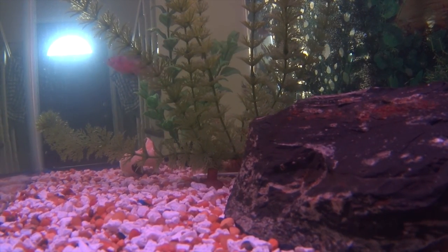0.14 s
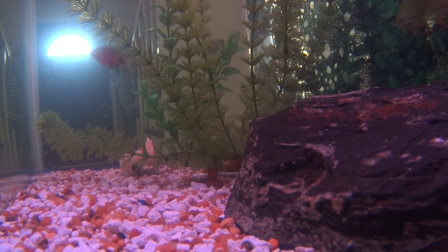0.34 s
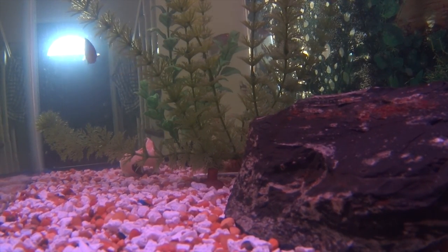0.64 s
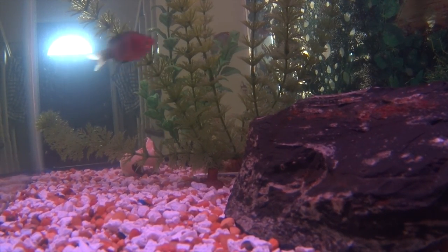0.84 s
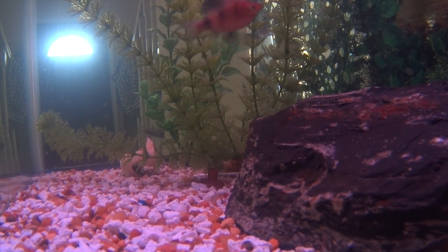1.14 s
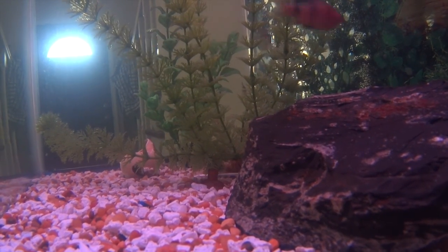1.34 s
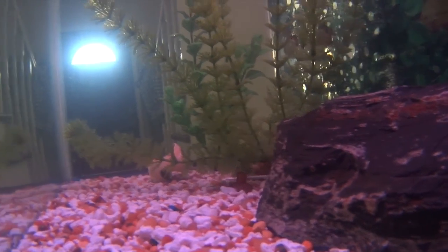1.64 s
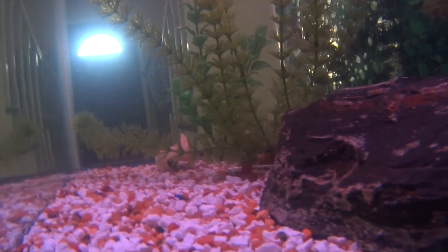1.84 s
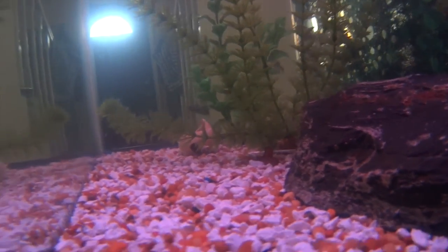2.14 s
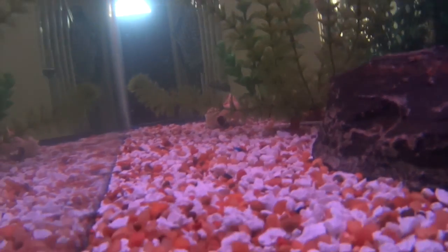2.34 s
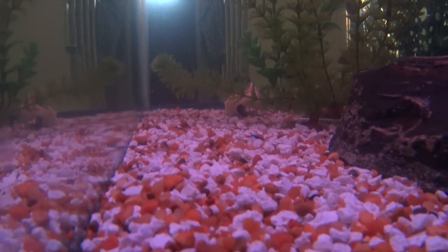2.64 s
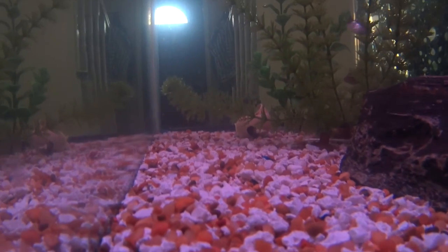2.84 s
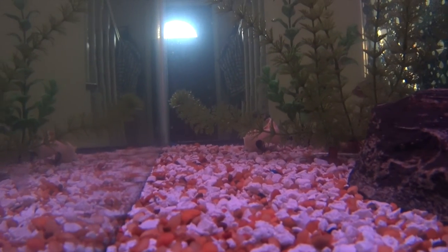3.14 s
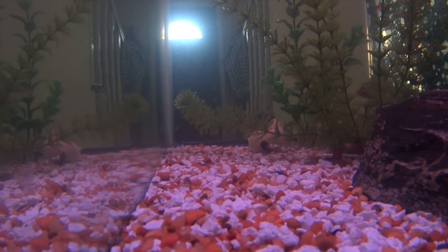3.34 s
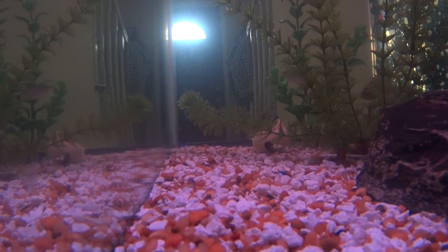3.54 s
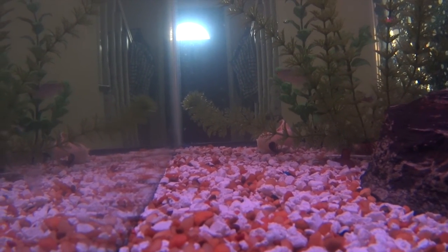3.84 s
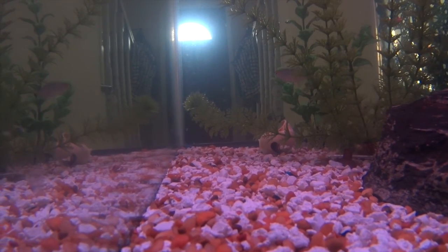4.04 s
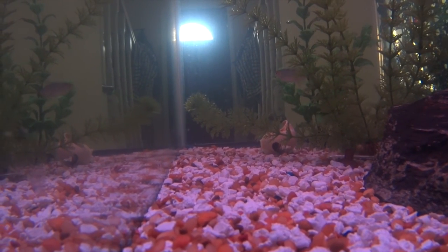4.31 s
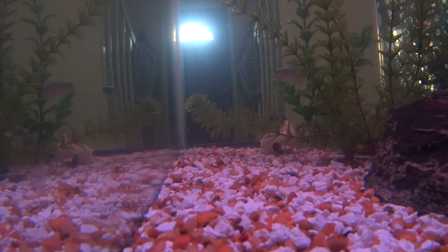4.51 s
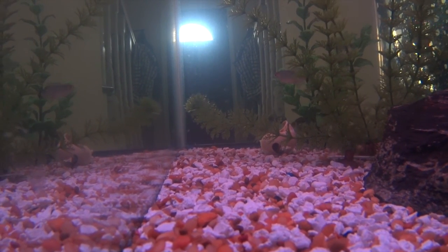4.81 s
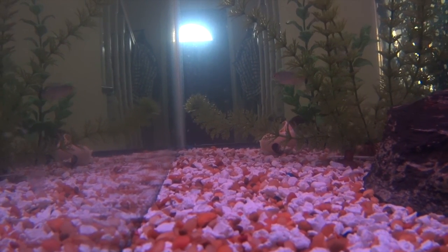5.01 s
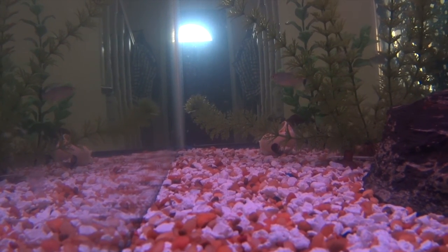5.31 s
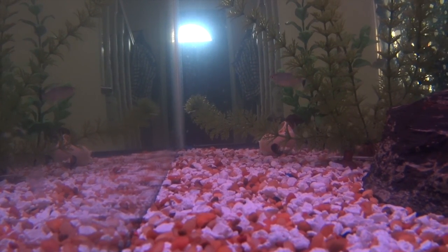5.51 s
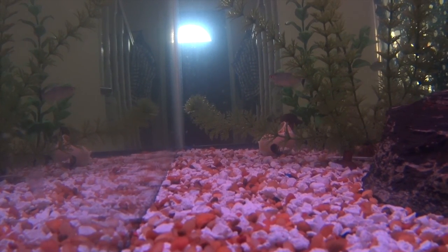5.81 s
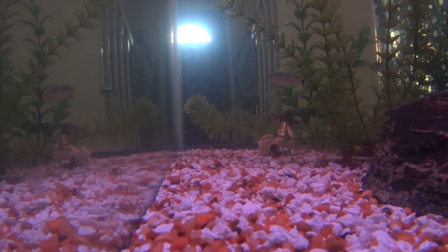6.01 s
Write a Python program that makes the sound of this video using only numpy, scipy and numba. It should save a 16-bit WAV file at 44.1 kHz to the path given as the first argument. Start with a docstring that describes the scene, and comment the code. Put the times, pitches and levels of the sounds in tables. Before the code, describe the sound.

Deep aquarium pump hum with faint gurgles; a camera case bangs and scrapes over gravel, then bubbles pop over a softened hum.

```python
"""Camera moved in a fish tank

A camera in a waterproof case sits in a fish tank: mains harmonics make the pump hum, coloured random
clicks and noise the churning filter outflow, decaying tones and splashes the gurgling bubbles.
The case is slid to a new spot: struck modes make its knocks, shaped grains its scrape over gravel,
stick-slip tones its groans, and decaying pulses the dry clicks of overload among the loud knocks.
Loud knocks push the gain control down; the hum creeps back over seconds.
"""
import sys
import numpy as np
from scipy import signal
from scipy.fft import rfft, irfft
from scipy.io import wavfile
from numba import njit

SR = 44100
rng = np.random.default_rng(int(sys.argv[2]) if len(sys.argv) > 2 else 0)


def to_wav(s):
    """Save 16-bit WAV."""
    ch = np.atleast_2d(s).T  # columns
    pcm = np.round(np.clip(ch, -1, 1) * 32767)  # PCM
    wavfile.write(sys.argv[1], SR, pcm.astype(np.int16))


N = 271828
TIME = np.arange(N) / SR
FREQ = np.maximum(np.arange(N + 1) * SR / (2 * N), 1)  # bins of a transform of length 2 N [Hz]
MAINS_HZ = 60.0

# travel of the camera: (time [s], position [0 first spot to 1 second spot])
CAMERA_TRAVEL = [(0, 0.023), (1.6, 0), (2.1, 0.31), (2.4, 0.74), (2.7, 0.98), (6.16, 0.9)]
# gravel grit heard through the case: (frequency [Hz], relative level [dB])
GRAVEL_SPECTRUM = [(500, -25), (1400, -1.5), (2200, -9.5), (2600, -7.5), (2900, -0.5), (3300, -9.5),
                   (4000, -16), (4620, -3.5), (5100, -20), (5600, -14), (6300, -26.5), (7500, -27.5),
                   (9000, -47.5), (11000, -52)]


def knocks(crack_s=0.0039, low_hz=52):
    """Modal impact: blows ring the case and crack on gravel; a longer contact excites only low modes."""
    # blows on the case: (time [s], relative level [dB], contact time [s])
    blows = [(1.517, -23.5, 0.00058), (1.595, -24, 0.00044), (1.615, -13, 0.00074), (1.667, -19, 0.00043),
             (1.734, -20.5, 0.00062), (2.407, -2, 0.0013), (2.458, -3, 0.00094), (2.462, 11.5, 0.0066),
             (2.493, 0, 0.0012), (2.522, 2.5, 0.0016), (2.529, 13, 0.012), (2.553, 3, 0.0021),
             (2.579, 7, .004), (2.601, 4, 0.0048), (2.626, -9.5, 0.0008), (2.670, -4, 0.0012),
             (2.700, 4, 0.0086), (2.711, -6.5, 0.00067), (2.745, -6.5, 0.00099), (2.782, -2.5, 0.0014),
             (2.789, 7.5, 0.011), (2.815, -8.5, .0007), (2.934, -12.5, 0.00076), (2.979, 9, 0.008),
             (2.993, -17.5, 0.00045)]
    # modes of the struck case: (frequency [Hz], relative level [dB], t60 [s])
    case_modes = [(60, -11.5, .05), (93, -4.5, 0.11), (212, -9.5, 0.062), (285.3, 1, 0.07),
                  (402.6, 0.5, 0.082), (500, 1, 0.12), (617, -4.5, 0.034), (1300, 1.5, 0.043),
                  (2840, -14.5, 0.037), (4700, -20.5, 0.029), (7300, -28.5, .012)]
    # past the hard contact time the crack loses level with each doubling
    hard_contact_s, crack_db, loss_db_per_doubling = 0.00074, -9.5, 22.5

    force, cracks, t = np.zeros(N), np.zeros(N), TIME[:SR // 4]
    for s, db, contact in blows:
        push = t * np.exp(-2 * np.pi * t / contact)
        add(force, s, undb(db) * push / push.sum())
        doublings = max(np.log2(contact / hard_contact_s), 0)
        crack_level = undb(db + crack_db - loss_db_per_doubling * doublings)
        add(cracks, s, crack_level * np.exp(-t / crack_s))

    ring = sum(undb(db - 60 * t / t60) * np.sin(2 * np.pi * hz * t) for hz, db, t60 in case_modes)
    high_pass = signal.butter(2, low_hz, "high", fs=SR, output="sos")
    body = signal.sosfilt(high_pass, signal.fftconvolve(force, ring)[:N])
    crack_noise = cracks * spread(*rng.standard_normal((2, N)), width=.35)
    return undb(-6.0) * body + tint(crack_noise, spectrum(GRAVEL_SPECTRUM))


def slide(release_s=0.012, ring_q=15):
    """Stick-slip friction shakes the case; gravel grit rings a resonance that shifts with the grip."""
    # pushes along the gravel: (start [s], length [s], build-up [s], level [dB], relative grit level [dB],
    # case resonance [Hz], ring level relative to the grit [dB])
    pushes = [(1.361, .022, 0.017, -19.5, -13.5, 2850, -3), (1.517, 0.024, .022, -15, -19, 2850, -4),
              (1.549, 0.076, 0.075, -10.5, -17, 2720, 12), (1.628, 0.048, 0.023, -13.5, -11.5, 2840, -5),
              (1.686, 0.012, .01, -17, -22.5, 2800, -2), (2.405, 0.18, 0.017, -14, -43, 2900, -14),
              (2.635, 0.062, 0.028, -6.5, -18, 2900, -10), (2.708, 0.043, 0.017, -7, -11, 3030, -14),
              (2.758, 0.074, .012, -7, -15.5, 2910, -6), (2.838, 0.06, 0.016, -6.5, -19, 2950, -12),
              (2.913, 0.074, 0.023, -7.5, -17, 2900, -7)]
    # body of the rubbing: (frequency [Hz], relative level [dB])
    rub_spectrum = [(25, -42), (60, 1), (105, 4.5), (230, -2.5), (400, -6), (610, -6), (780, -15.5),
                    (1300, -17), (1700, -34), (3000, -75)]

    body = tint(grains(2500, 0.54), spectrum(rub_spectrum))
    gravel = spread(grains(9000, 2.9), grains(9000, 2.5), width=.4)
    grit = tint(gravel, spectrum(GRAVEL_SPECTRUM))
    shaking, gritting = 0, 0
    for start, length, attack, db, grit_db, hz, ring_db in pushes:
        push = undb(db) * swell(start, length, attack, release_s)
        ring = signal.lfilter(*signal.iirpeak(hz, ring_q, fs=SR), grit)
        shaking = shaking + push
        gritting = gritting + undb(grit_db) * push * (grit + undb(ring_db) * ring)
    flutter = undb(1.0 * walk(33))
    return flutter * (shaking * body + gritting * undb(2.2 * walk(140) - 9.0))


def groan(jitter=0.0905, overtone_hz=570, width_hz=300, attack_s=0.015, release_s=0.0057):
    """Stick-slip oscillation against the glass slows and dulls; its overtones ring the tank wall."""
    # judders: (start [s], length [s], level [dB], first slip rate [Hz], first relative overtone level [dB])
    judders = [(2.407, .054, -9, 275.5, 1), (2.483, 0.068, -10.5, 228.2, -1), (2.556, .058, -11, 249.9, -4),
               (2.628, 0.033, -10.5, 195.8, -19)]
    sag_octaves_per_s, overtone_fade_db_per_s = 3.1, 80

    uneven = 1 + jitter * walk(93)
    rasp = .5 * rng.standard_normal(N)
    wall_db = -12 * np.log10(1 + (2 * (FREQ - overtone_hz) / width_hz) ** 4)
    out = 0
    for start, length, db, hz, overtone_db in judders:
        age = np.clip(TIME - start, 0, length)
        slip_rate = hz * 2 ** (-sag_octaves_per_s * age) * uneven
        phase = 2 * np.pi * np.cumsum(slip_rate) / SR
        overtones = unit(colour(np.sin(2 * phase) + np.sin(3 * phase) + rasp, wall_db))
        overtone_gain = undb(overtone_db - overtone_fade_db_per_s * age)
        judder = unit(np.sin(phase)) + overtone_gain * overtones
        out = out + undb(db) * swell(start, length, attack_s, release_s) * judder
    return out * undb(2.0 * walk(54))


def overload_clicks(dull_hz=6000, decay_s=.00012):
    """Overload: dry clicks of a limiter overdriven by loud knocks, as low-passed pulses at set times."""
    # clicks: (time [s], level before dulling [dB])
    clicks = [(2.4042, -25.5), (2.429, -24.5), (2.454, -14), (2.49, -36.5), (2.519, -25.5), (2.529, -34)]
    out, t = np.zeros(N), TIME[:SR // 100]
    for s, db in clicks:
        add(out, s, undb(db) * np.exp(-t / decay_s))
    return signal.sosfilt(signal.butter(2, dull_hz, fs=SR, output="sos"), out)


def gurgles(rise_s=0.00088, glide=0.039):
    """Resonance: bubbles jolt the tank, boom its wall and ring, rising in pitch; so does one case ring."""
    # large bubbles and one ring of the case:
    # (time [s], level [dB], starting pitch [Hz], relative ring level [dB], decay [s],
    # relative boom of the tank wall [dB])
    # the row at 2.456 s is no bubble: the case, struck, rings briefly near 1.3 kHz
    bubbles_and_case_ring = [(.116, -28.5, 894, -5, .04, -7.5), (.272, -27.5, 643, -2.5, 0.016, -8.5),
                             (.863, -14, 506, -6.5, .0066, -19), (1.43, -24.5, 721, -2.5, 0.007, -7.5),
                             (2.002, -22, 1054, -4.5, 0.025, -7.5), (2.177, -26.5, 1389, -2.5, .02, -13.5),
                             (2.456, -8.5, 1304, 1.5, 0.0043, -20), (3.012, -16, 1203, -5.5, .017, -13),
                             (3.218, -25, 1580, -3, 0.0091, -7.5), (3.288, -19.5, 1350, -5, 0.015, -13.5),
                             (3.455, -17, 1250, -7, 0.0088, -15), (3.727, -18, 1333, -2, 0.016, -8),
                             (3.779, -19, 1340, -2.5, 0.022, -8.5), (3.842, -16, 269, 7.5, .03, -14),
                             (3.85, -21.5, 1283, 4, .018, -7), (4.048, -17.5, 1340, -5.5, 0.011, -4.5),
                             (4.177, -22.5, 780, -2.5, 0.0099, -7), (4.227, -7.5, 1297, 0, .01, -14),
                             (4.263, -17.5, 1300, -5, 0.021, -9), (4.335, -19, 1320, -8, 0.016, -6.5),
                             (4.411, -16, 1250, -11, 0.016, -6), (4.595, -25.5, 1146, -1, 0.021, -9.5),
                             (4.713, -22.5, 1300, -1.5, 0.016, -10), (4.794, -18, 690, -4.5, .05, -6),
                             (4.903, -14.5, 684, -2, 0.028, -5), (4.914, -17.5, 1113, -7.5, .026, -11.5),
                             (5.076, -18.5, 1240, -2.5, 0.014, -1), (5.086, -20, 1390, -1, 0.0089, 2),
                             (5.177, -24.5, 1350, -8, .013, 2.5), (5.322, -22, 1373, -5, 0.01, -3),
                             (5.435, -27.5, 1330, -1, 0.013, -9.5), (5.668, -24, 525, -7.5, 0.013, -7.5),
                             (5.799, -23, 1330, -12, .018, 0), (5.904, -19.5, 766, -2, 0.01, -6),
                             (6.077, -24.5, 1500, -13, 0.01, -3.5), (6.121, -26.5, 1370, -9, .01, -8)]
    # splash of a jolt, as of a bubble breaking loose: (frequency [Hz], relative level [dB])
    splash_spectrum = [(100, -12.5), (300, 4), (600, 6), (1000, -2), (1400, -13), (1800, -34.5),
                       (3000, -38), (8000, -59)]

    jolts, rings, t = np.zeros(N), np.zeros(N), TIME[:SR // 4]
    for s, db, hz, ring_db, decay, boom_db in bubbles_and_case_ring + small_bubbles():
        envelope = undb(db) * (1 - np.exp(-t / rise_s)) * np.exp(-t / decay)
        pitch = hz * (1 + glide * (1 - np.exp(-t / decay)))
        tone = np.sin(2 * np.pi * np.cumsum(pitch) / SR)
        add(jolts, s, envelope * rng.standard_normal(len(t)))
        add(rings, s, 2 * undb(ring_db) * envelope * tone)
        add(rings, s, undb(db + boom_db) * wall_boom(t))
    splash_db = spectrum(splash_spectrum) + 0.8 * tank_db(axis=2)
    return rings + undb(2.0) * tint(jolts, splash_db)


def small_bubbles(count=80):
    """Random arrivals: small bubbles at chance times and pitches, as rows like those of the large ones."""
    per_s, centre_hz, spread_octaves = 7, 1273, 0.13
    level_db, second_spot_db, scatter_db = -37, 6, 2.5  # louder at the second spot
    ring_db, decay_s, boom_db = -6, 0.013, -3.5

    times = np.cumsum(rng.gamma(3, 1 / 3, count) / per_s)
    chance, travel = rng.standard_normal((count, 2)), curve(CAMERA_TRAVEL)
    rows = []
    for s, (size, pitch) in zip(times, chance):
        if s < TIME[-1]:
            db = level_db + second_spot_db * travel[int(s * SR)] + scatter_db * size
            rows.append((s, db, centre_hz * 2 ** (spread_octaves * pitch), ring_db, decay_s, boom_db))
    return rows


def wall_boom(t, build_s=0.0018, detune=0.014):
    """Modal ringing of the tank wall, a little different each time."""
    # wall modes: (frequency [Hz], relative level [dB], t60 [s])
    wall_modes = [(473, -10.5, 0.11), (558.8, 1, .2), (661.4, -2.5, .2), (776, -9, 0.072)]
    chance = rng.standard_normal((len(wall_modes), 2))
    ring = sum(undb(db - 60 * t / t60) * np.sin(2 * np.pi * (hz * (1 + detune * off) * t + turn))
               for (hz, db, t60), (off, turn) in zip(wall_modes, chance))
    return ring * (1 - np.exp(-t / build_s))


def fizzes():
    """Granular noise: escaping air sprays tiny bubbles that trail off in a hiss."""
    # sprays: (time [s], level [dB], build-up [s], decay [s])
    sprays = [(3.777, -32, .001, .027), (3.822, -37.5, 0.014, 0.04), (4.899, -45.5, 0.0022, .015)]
    # their spectrum: (frequency [Hz], relative level [dB])
    spray_spectrum = [(800, -16.5), (2000, 3), (3000, 7), (3700, -5.5), (5200, 3), (5800, -6), (6700, -7),
                      (7250, -4), (8100, -10), (9400, -35), (11000, -33)]
    envelope = sum(undb(db) * swell(s, attack, attack, decay) for s, db, attack, decay in sprays)
    return tint(envelope * grains(6000, 1.4), spectrum(spray_spectrum))


def outflow(travel, buzz=0.18, treble_hz=2200):
    """Resonant filtering: countless small bubbles ring the tank; the treble pulses with the pump stroke."""
    # churning water before the tank's lift:
    # (frequency [Hz], level at first spot [dB per Hz], level at second spot [dB per Hz])
    churn_spectrum = [(20, -79.5, -64), (41.8, -51.5, -56), (80.4, -59, -47.5), (153, -49, -45.5),
                      (326, -54, -48.5), (520, -58, -54), (642, -59.5, -61), (836, -76, -64),
                      (985, -70, -74.5), (1480, -83.5, -72.5), (2220, -93, -84), (3950, -94, -91),
                      (7500, -105, -105), (11500, -121, -119)]

    churn = grains(2500, 1.2) * undb(1.3 * walk(9.9))
    stroke = unit_power(1 + buzz * np.cos(2 * np.pi * MAINS_HZ * TIME))
    hiss = stroke * spread(*rng.standard_normal((2, N)), width=.42)
    # power crossover: churn below, hiss above
    treble = 1 / (1 + (treble_hz / FREQ) ** 4)
    drive = shape(churn, np.sqrt(1 - treble)) + shape(hiss, np.sqrt(treble))
    drive = drive * np.sqrt(SR / 2)  # unit power per Hz
    first = colour(drive, spectrum(churn_spectrum, axis=1) + tank_db(axis=1))
    second = colour(drive, spectrum(churn_spectrum, axis=2) + tank_db(axis=2))
    return (1 - travel) * first + travel * second


def tank_db(axis):
    """Resonance: the modes of tank and case change the level of bands by an amount set by the spot."""
    # (frequency [Hz], width [Hz], lift at first spot [dB], lift at second spot [dB])
    resonances = [(220.1, 22.5, 9, 10), (280.2, 31, 8, 6.5), (328.8, 29.6, 10, 6.5), (395, 19, 6, 0),
                  (565.5, 38, 3, 6), (655, 22, 2, 11), (890, 11, 5.5, 8), (1141, 101, 3.5, 17.5),
                  (1242.5, 54, 14.5, 9.5), (1341, 107, 14, 16.5), (1588.6, 62, 18, 13.5), (1653, 97, -6, 6),
                  (1797, 200, 8, 5), (2019, 51, 7, 14), (2924, 340, 13.5, 16.5), (3575, 217, 16.5, 8.5),
                  (4310, 190, 7.5, 7.5), (4816, 360, 7, 11.5), (5288, 480, 15, 14), (5820, 200, -8.5, -15),
                  (6080, 350, 10.5, 9)]
    return sum(row[axis + 1] * 2 ** -((2 * (FREQ - row[0]) / row[1]) ** 2) for row in resonances)


def pump(travel):
    """Standing waves: mains harmonics whose levels differ from spot to spot."""
    # (multiple of the mains, level at first spot [dB rms], level at second spot [dB rms])
    harmonics = [(1, -22.5, -19.5), (2, -21.5, -27.5), (3, -34, -30), (4, -44.5, -42), (5, -55, -35),
                 (6, -47, -49)]
    phase = 2 * np.pi * MAINS_HZ * TIME + 0.062 * walk(2.0)
    moved = travel ** 3
    hum = 0
    for k, first, second in harmonics:
        level_db = first + (second - first) * moved + 0.79 * walk(2.2)
        hum = hum + np.sqrt(2) * undb(level_db) * np.sin(k * phase + rng.uniform(0, 2 * np.pi))
    return hum


def undb(db):
    """Decibel law: level to amplitude gain."""
    return 10 ** (np.asarray(db) / 20)


def unit(x):
    """Normalisation to standard deviation 1."""
    return x / np.std(x)


def unit_power(x):
    """Normalisation of an envelope to mean square 1."""
    return x / np.sqrt(np.mean(x ** 2))


def curve(rows, axis=1):
    """Linear interpolation of one column of a time table at every sample."""
    rows = np.array(rows)
    return np.interp(TIME, rows[:, 0], rows[:, axis])


def spectrum(rows, axis=1):
    """Interpolation of one column of a frequency table over log frequency."""
    rows = np.array(rows)
    return np.interp(np.log(FREQ), np.log(rows[:, 0]), rows[:, axis])


def shape(x, gain):
    """Convolution theorem: filter by a gain for every bin."""
    return irfft(rfft(x, 2 * N) * gain)[..., :N]


def colour(x, db):
    """Minimum-phase filter with a dB response: resonances ring after their cause."""
    cepstrum = irfft(np.log(undb(db)))
    cepstrum[1:N] *= 2  # fold to the causal half
    cepstrum[N + 1:] = 0
    return shape(x, np.exp(rfft(cepstrum)))


def tint(x, db):
    """Power-preserving colouring of white noise."""
    return colour(x, db - 10 * np.log10(np.mean(undb(db) ** 2)))


def walk(rate):
    """Low-passed noise: random wander up to about rate [Hz], standard deviation 1."""
    return unit(shape(rng.standard_normal(N), 1 / (1 + (FREQ / rate) ** 4)))


def grains(rate, spread_db):
    """Shot noise: random clicks of uneven size, rate [1/s], standard deviation 1."""
    size = undb(spread_db * np.minimum(rng.exponential(size=N), 4))
    return unit((rng.random(N) < rate / SR) * size * rng.choice([-1, 1], N))


def spread(mid, side, width):
    """Mid-side sum and difference: two channels that are partly alike."""
    return mid + width * side * np.array([[1], [-1]])


def swell(start, length, attack, release):
    """Envelope with a linear build-up, a hold and an exponential decay."""
    age = TIME - start
    return np.clip(age / attack, 0, 1) * np.exp(-np.maximum(age - length, 0) / release)


def add(track, s, sound):
    """Superposition: mix a sound in at a time [s]."""
    start = int(s * SR)
    track[start:start + len(sound)] += sound[:N - start]


def scene():
    """Superposition of the sounds of case, bubbles, water and pump with the overload clicks."""
    travel = np.clip(curve(CAMERA_TRAVEL), 0, 1)
    handling = knocks() + slide() + groan() + overload_clicks()
    return handling + gurgles() + fizzes() + outflow(travel) + pump(travel)


@njit
def duck(over_db, attack, release):
    """Peak-following gain reduction [dB]: quick to follow an overload, slow to let go."""
    out, cut = np.empty(len(over_db)), 0.
    for i in range(len(over_db)):
        if over_db[i] > cut:
            cut += attack * (over_db[i] - cut)
        else:
            cut = max(cut - release, 0.)
        out[i] = cut
    return out


def record(dry, ceiling_db=-5.5, attack_s=0.00052, recovery_db_per_s=3.0, top_hz=11100):
    """Gain control, level and phase differences of two microphone ports, clipping and a treble cut-off."""
    # the case shades the left port: (frequency [Hz], left minus right [dB], left lag [rad])
    port_shading = [(60, -2.5, 0.65), (125, -6, 0.29), (270, -6.5, 0.41), (500, -5, 0.59), (1230, -1.5, .2),
                    (2500, -0.7, .1), (6000, 0, 0.26)]
    over_db = 20 * np.log10(np.abs(dry.mean(axis=0)) + 1e-9) - ceiling_db
    ahead = np.roll(over_db, -int(2 * attack_s * SR))  # look ahead by two attack times
    held = dry * undb(-duck(ahead, 1 / (attack_s * SR), recovery_db_per_s / SR))

    ratio = undb(spectrum(port_shading, axis=1)) * np.exp(-1j * spectrum(port_shading, axis=2))
    # scaled so that the mean of both ports keeps its magnitude
    ports = shape(held, np.array([ratio, np.ones(N + 1)]) * 2 / np.abs(1 + ratio))
    low_pass = signal.ellip(8, .2, 70, top_hz, fs=SR, output="sos")
    return signal.sosfilt(low_pass, np.clip(ports, -1, 1))


dry = scene()
out = record(dry)
to_wav(out)
```